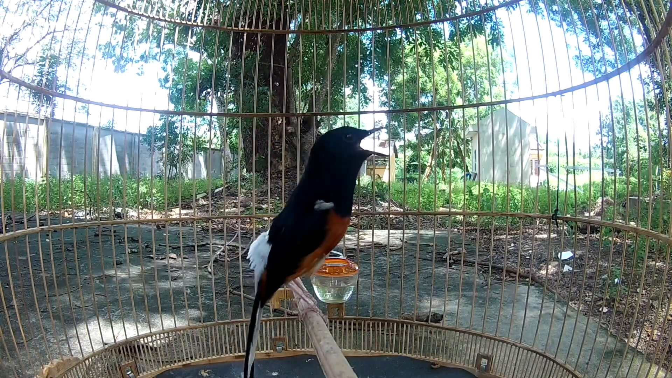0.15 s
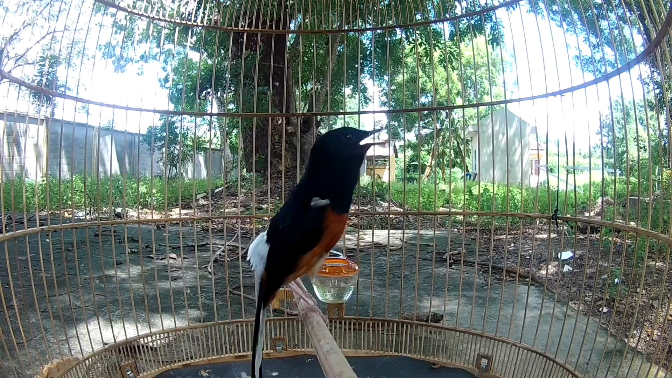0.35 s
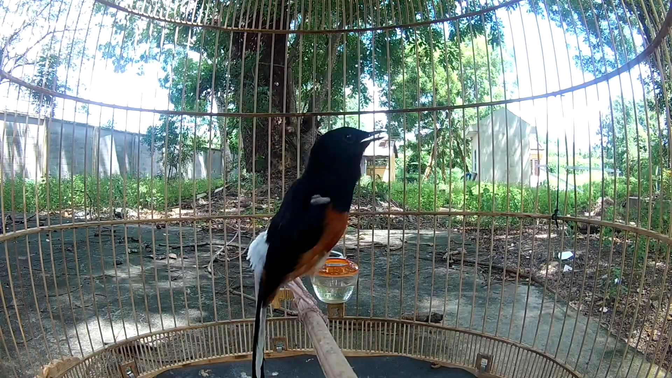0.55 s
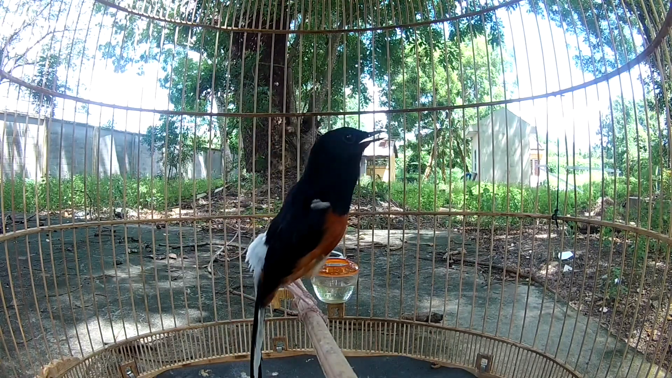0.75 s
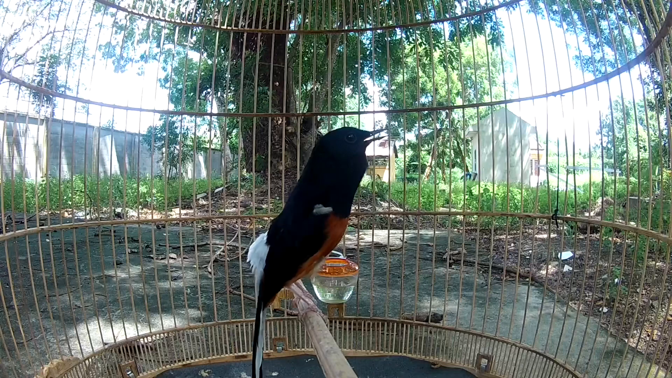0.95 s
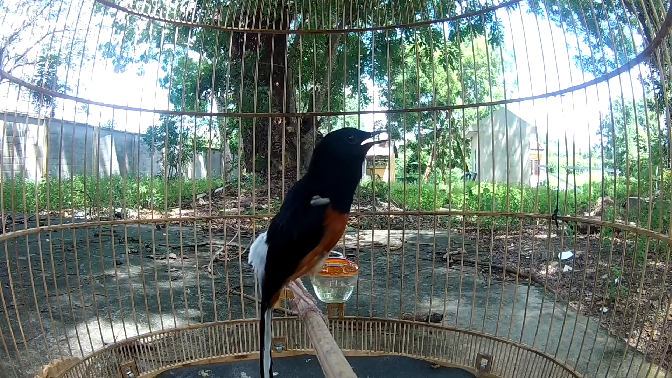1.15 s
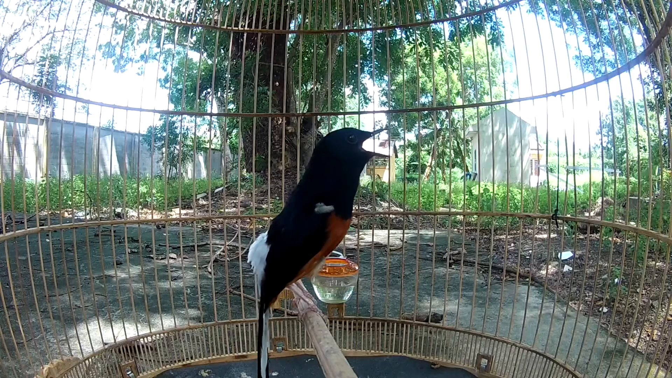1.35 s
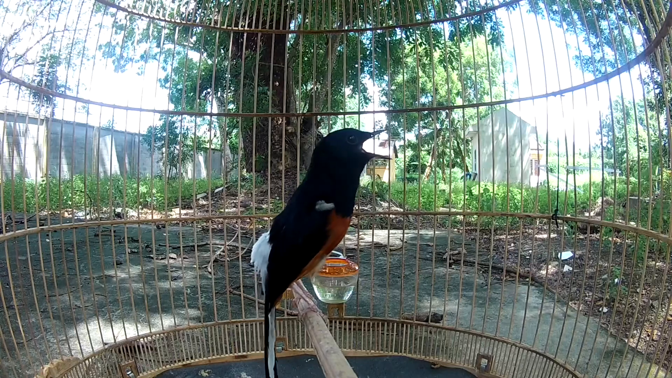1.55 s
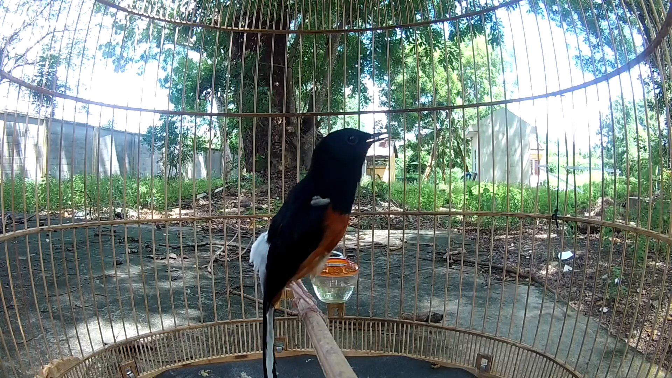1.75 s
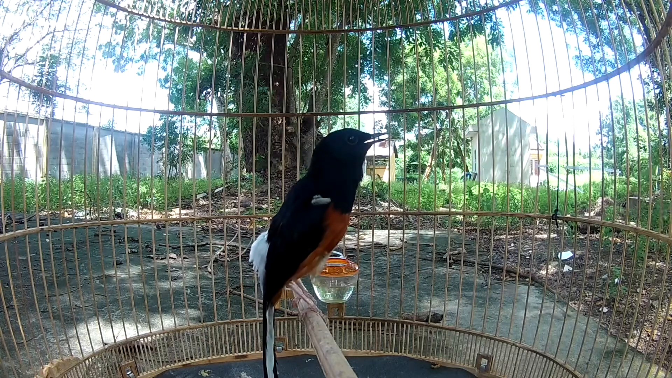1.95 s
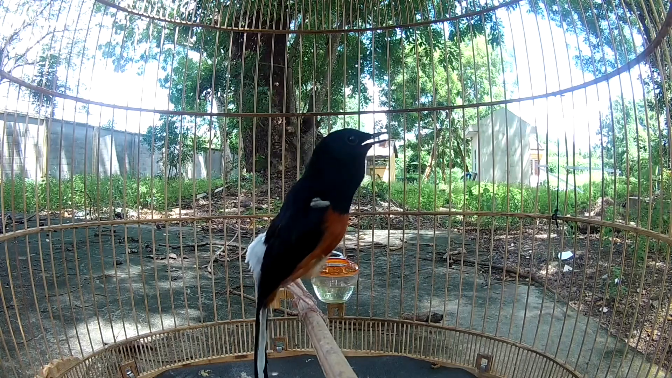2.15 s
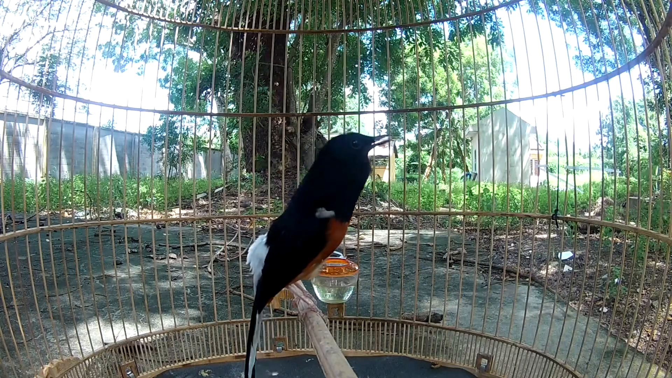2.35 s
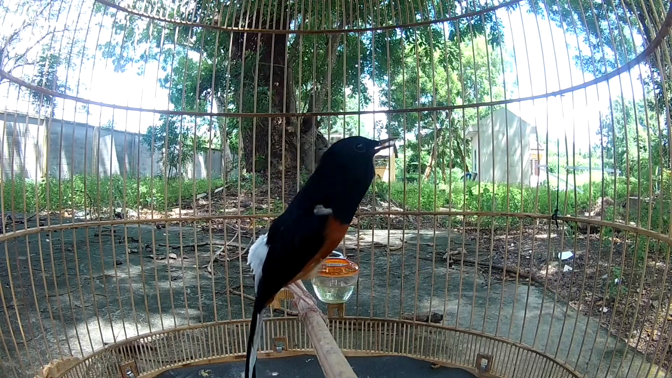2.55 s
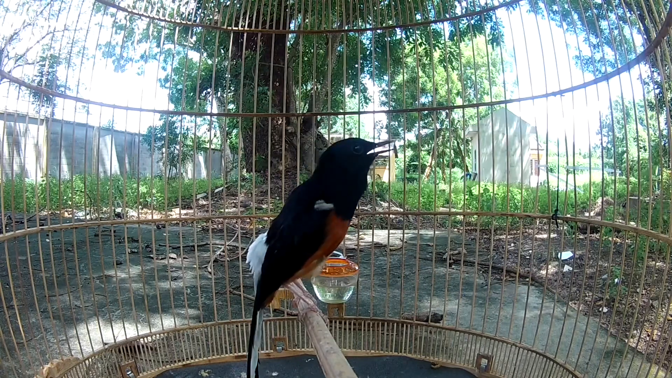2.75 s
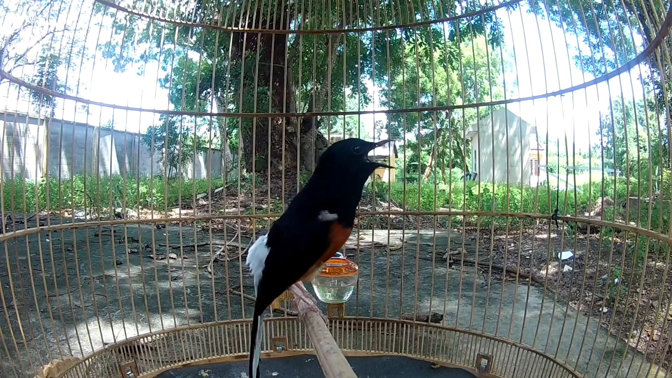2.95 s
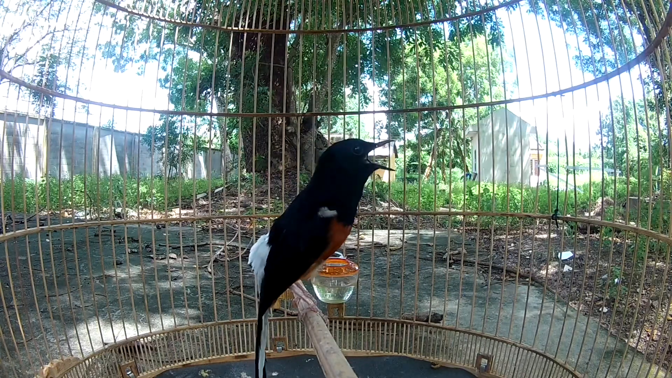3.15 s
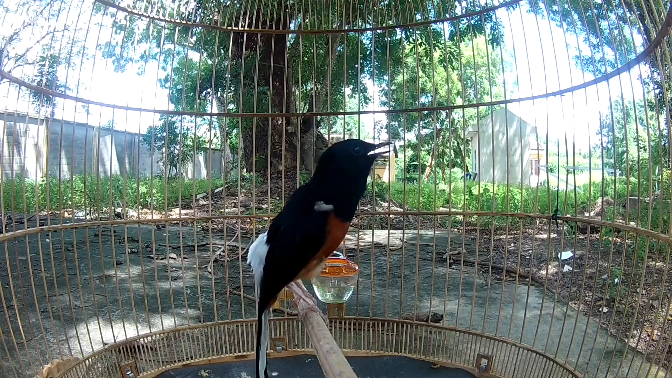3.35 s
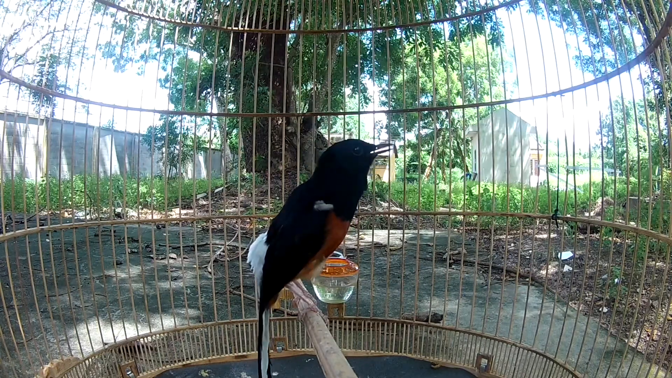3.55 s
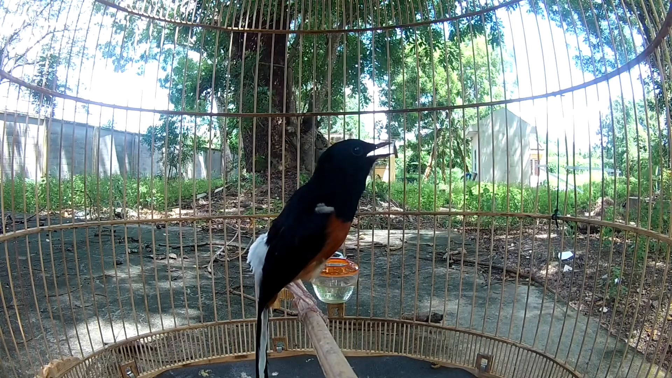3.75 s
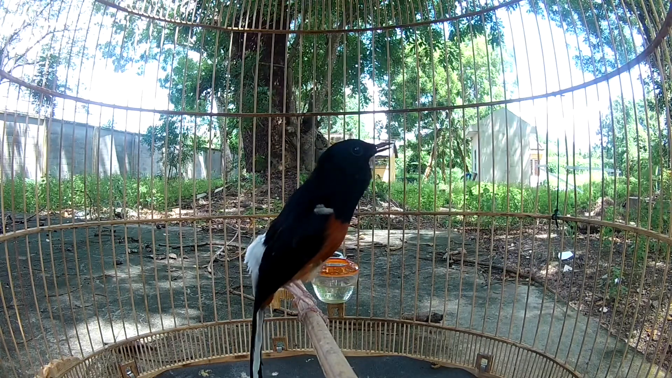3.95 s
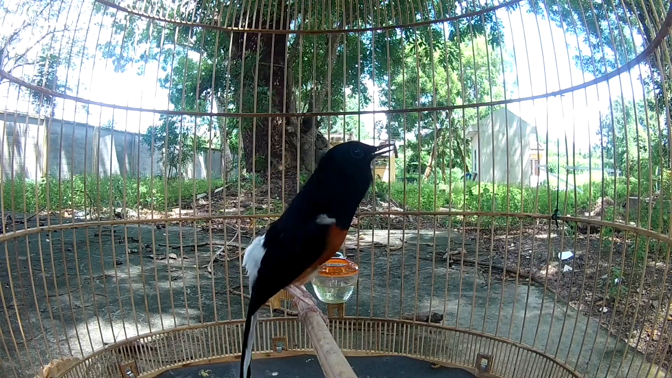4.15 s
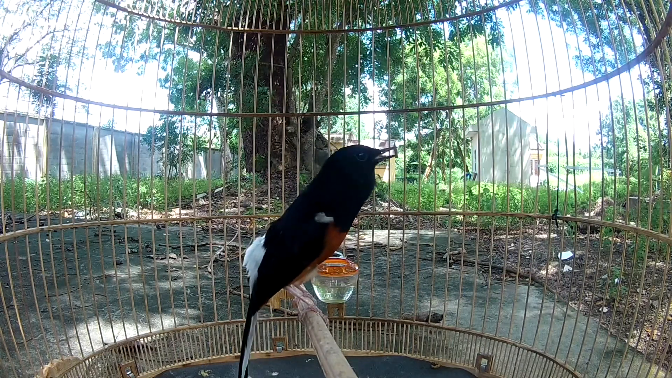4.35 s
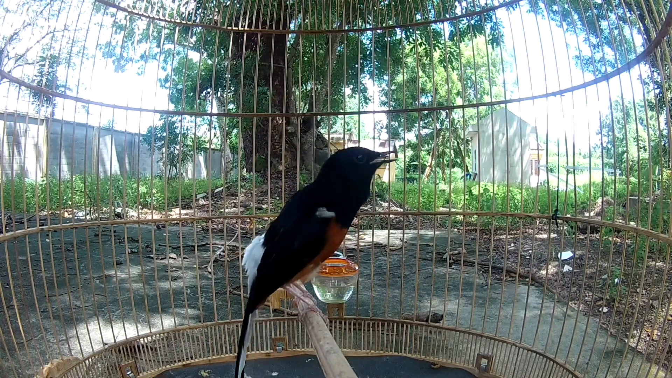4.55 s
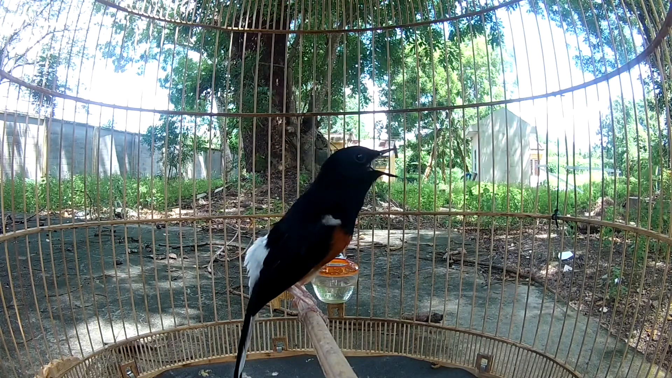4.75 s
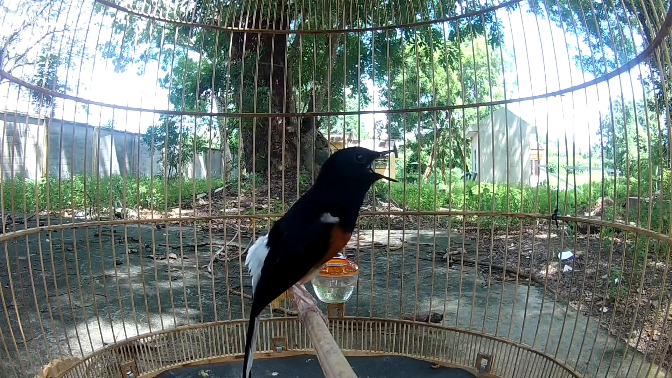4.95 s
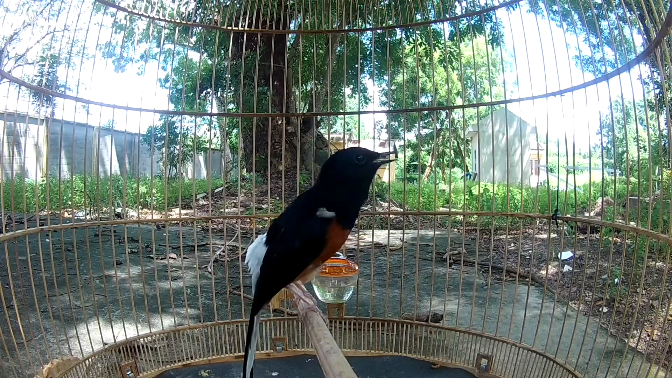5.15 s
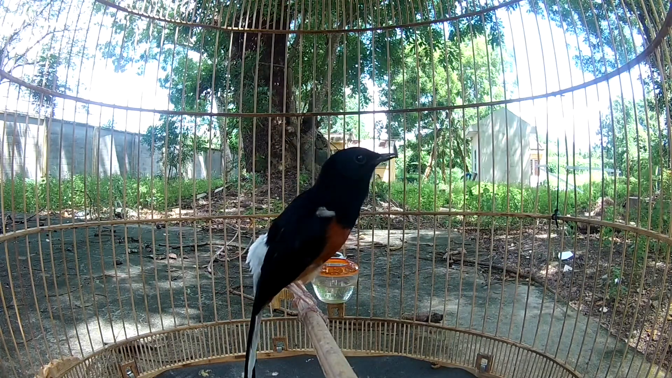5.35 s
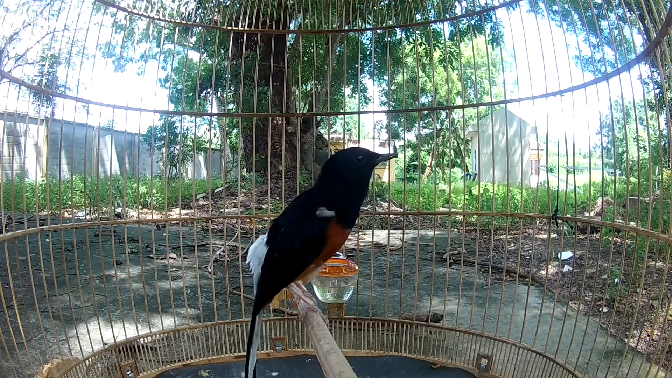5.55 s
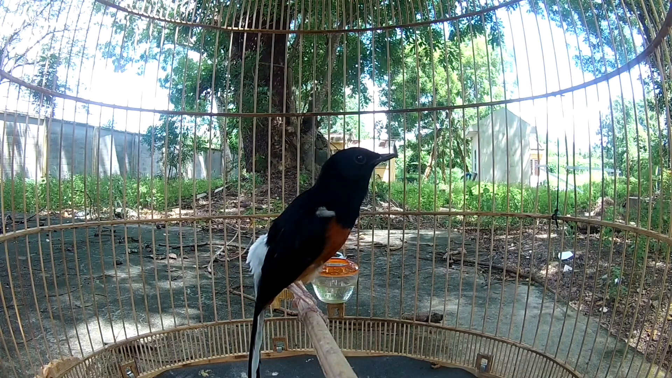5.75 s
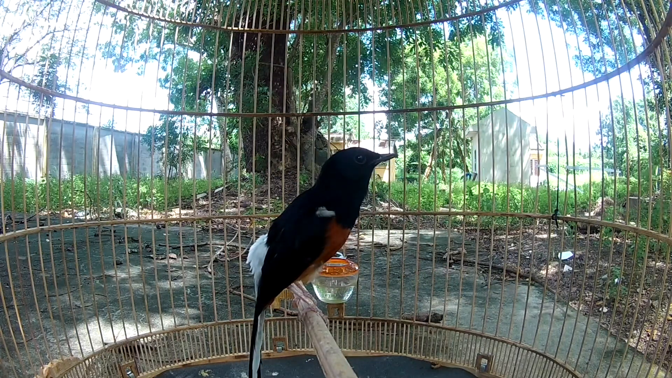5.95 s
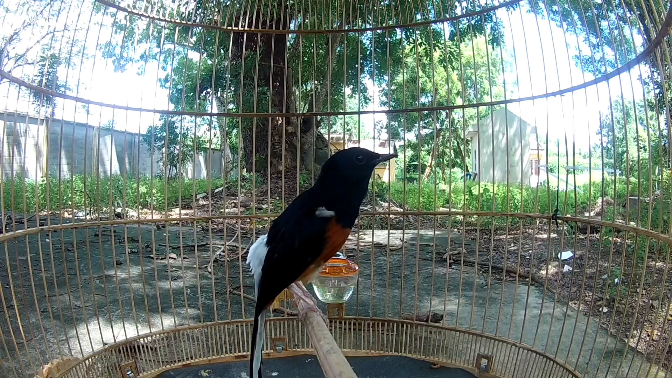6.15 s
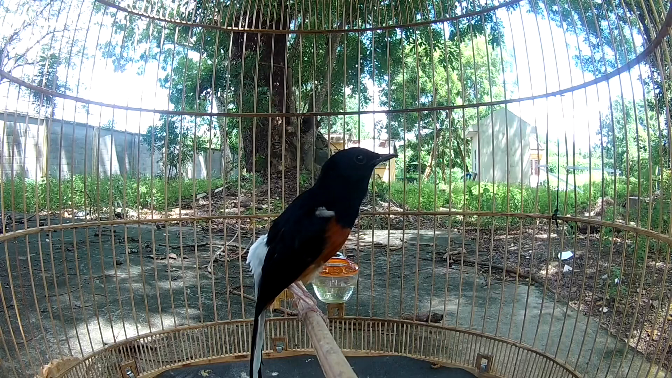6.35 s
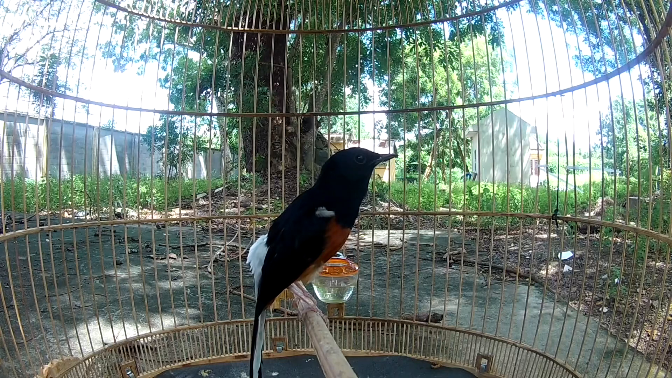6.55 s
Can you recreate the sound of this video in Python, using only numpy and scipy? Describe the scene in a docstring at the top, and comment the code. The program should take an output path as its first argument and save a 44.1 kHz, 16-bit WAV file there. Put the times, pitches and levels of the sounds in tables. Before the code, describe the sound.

A caged songbird sings close by in a yard, loud and clear with a slight, short echo. It opens with a whistle that climbs, trembles and ends in a quick zigzag. A falling whistle and a low swoop with a final flick follow from 0.7 to 1.1 seconds. The loud rising slur returns at about 1.3, 2.8 and 4.7 seconds, each lasting under half a second. Between these, a soft chup leads into a burst of rattling chatter at 2.1 seconds and again at 4 seconds, with a quiet twitter at 3.7. After a pause from 5.1 seconds, a softer, thin whistle rises slowly from 6 seconds and turns raspy around 6.4. Another bird calls faintly in the distance between 0.6 and 2.1 seconds. A faint motor hum and low air noise continue throughout, and soft background noise swells from about 5.7 seconds.

```python
"""A yard with a caged shama singing close by. Its syrinx makes loud slurs that climb, tremble and end
in a zigzag, low swoops, soft chups, two bursts of chatter from both sides at once, a twitter and a thin
whistle that turns raspy. Throat and beak colour the overtones; trees and walls return a short tail.
A motor hums, another bird calls far off, and faint background noise swells near the end."""
import sys
import numpy as np
from scipy import signal
from scipy.fft import rfft, irfft, next_fast_len
from scipy.io import wavfile
from scipy.ndimage import uniform_filter1d

SR = 44100
rng = np.random.default_rng(int(sys.argv[2]) if len(sys.argv) > 2 else 0)


def store_pcm(level_fs):
    """Save levels as 16-bit WAV."""
    pcm = np.round(np.clip(level_fs, -1, 1) * 32767).astype(np.int16)
    wavfile.write(sys.argv[1], SR, np.atleast_2d(pcm).T)


N = 291501
TIME = np.arange(N) / SR
CUTOFF_HZ = 15900
# Throat and beak response. Each row: frequency in Hz, gain in dB.
BEAK_RESPONSE = [(2300, 12.5), (3300, -6.5), (5200, 0), (6800, 2), (8000, -2), (9500, 6.5), (11000, -1),
                 (15000, -4)]


def from_db(db):
    """Decibels to gain."""
    return 10 ** (np.asarray(db) / 20)


def unit_rms(x):
    """Scale to rms 1."""
    return x / np.sqrt(np.mean(x ** 2) + 1e-20)


def db_at(spectrum, hz):
    """Read a spectrum on a log-frequency axis."""
    freqs, db = np.transpose(spectrum)
    return np.interp(np.log(np.maximum(hz, 1)), np.log(freqs), db)


def along(rows, t):
    """Read a curve's columns at times t."""
    times, *columns = np.transpose(sorted(map(tuple, rows)))
    return [np.interp(t, times, column) for column in columns]


def span(start_s, end_s):
    """Sample times between two moments."""
    return TIME[max(0, int(start_s * SR)):int(end_s * SR)]


def glide(rows, start_s=0):
    """Times, pitch and level of a note along a curve."""
    t = span(start_s + rows[0][0] - .001, start_s + rows[-1][0] + .002)
    return (t, *along(rows, t - start_s))


def add(out, t, sound):
    """Mix a sound in at its sample times."""
    first = int(round(t[0] * SR))
    out[first:first + len(t)] += sound


def fade(t, rise_s, fall_s):
    """Quarter-sine attack and release."""
    rise = np.sin(np.pi / 2 * np.clip((t - t[0]) / rise_s, 0, 1))
    fall = np.sin(np.pi / 2 * np.clip((t[-1] - t) / fall_s, 0, 1))
    return rise * fall


def noise(spectrum, size):
    """Coloured noise, rms 1."""
    n = next_fast_len(size)
    gain = from_db(db_at(spectrum, np.arange(n // 2 + 1) * SR / n))
    return unit_rms(irfft(rfft(rng.standard_normal(n)) * gain, n)[:size])


def waver(rate_hz, size):
    """Random drift up to rate_hz, rms 1."""
    lowpass = signal.butter(2, rate_hz, fs=SR, output="sos")
    return unit_rms(signal.sosfilt(lowpass, rng.standard_normal(size + SR // 2))[SR // 2:])


def syrinx(hz, amplitude, kind, jitter, follow, brightness=1, usual_db=-15, flicker_db=4.5):
    """One syrinx side. Throat resonance swells the fundamental; overtones follow in part and flicker."""
    # Per kind of note: base levels in dB, from partial 2 up.
    overtones_db = {"slur": [-55.5, -73.5, -66.5], "swoop": [-52.5, -66, -77, -80], "twitter": [-43.5,
                    -66.5], "thin": [-57, -76.5, -89, -77.5], "chatter": [-51, -62, -77], "far": []}
    phase = 2 * np.pi * np.cumsum(hz * (1 + jitter * waver(250, len(hz)))) / SR
    drive = brightness * (np.abs(amplitude) / from_db(usual_db)) ** follow
    tone = amplitude * np.sin(phase)
    for k, db in enumerate(overtones_db[kind], 2):
        level_db = db + db_at(BEAK_RESPONSE, k * hz) + flicker_db * waver(70, len(hz))
        tone += drive * from_db(level_db) * (k * hz < CUTOFF_HZ) * np.sin(k * phase)
    return tone


def tremble(t, linger_s=.062):
    """Each trough lowers the pitch and nearly chokes the note; the pitch shake lingers."""
    # Each row: first crest in seconds, last crest in seconds, rate in Hz, depth 0-1.
    trembles = [(.104, .14, 56, .75), (1.402, 1.456, 74, .8), (3.011, 3.118, 56, .85),
                (4.8445, 4.941, 51.7, .88)]
    shake, choke = np.zeros(len(t)), np.zeros(len(t))
    for first_s, last_s, rate_hz, depth in trembles:
        swing = np.cos(2 * np.pi * rate_hz * (t - first_s))
        strength = depth * np.clip((t - first_s) * rate_hz + 1, 0, 1)
        shake += strength * np.clip(1 - (t - last_s) / linger_s, 0, 1) * swing
        choke += strength * np.clip((last_s - t) * rate_hz + .5, 0, 1) * ((1 - swing) / 2) ** 2
    return shake, choke


def whistle(t, hz, db, kind, jitter=.0012, opening_db=0, shimmer_db=0, flutter=0,
            scrape_db=-77, swerve_dulling=.012):
    """One whistled note; overtones grow by opening_db as the beak opens."""
    hz, db = uniform_filter1d(hz, size=90), uniform_filter1d(db, size=90)
    shake, choke = tremble(t)
    softness = np.clip((-9 - db) / 8, 0, 1)   # hard-pushed notes are steady
    unsteady = softness * waver(120, len(t))
    # Fast pitch swerves turn overtones into a scrape.
    swerve = uniform_filter1d(np.abs(np.gradient(np.log(hz))) * SR, size=500)
    brightness = from_db(opening_db * np.linspace(-.5, .5, len(t))) / (1 + swerve_dulling * swerve)
    amplitude = np.sqrt(2) * from_db(db + shimmer_db * unsteady) * (1 - choke)
    shaken_hz = hz * (1 + .037 * shake + flutter * unsteady)
    tone = syrinx(shaken_hz, amplitude, kind, jitter, follow=.24, brightness=brightness)
    lowpass = signal.butter(8, 9800, fs=SR, output="sos")
    scrape = from_db(scrape_db + db / 2) * swerve * signal.sosfilt(lowpass, noise(BEAK_RESPONSE, len(t)))
    out = np.zeros(N)
    add(out, t, (tone + scrape) * fade(t, .003, .003))
    return out


def zigzag(turns, first_floor_hz, crest_rise_hz, shoulder_hz=3430):
    """Pitch in Hz of a slur's turns: a shallow first dip, each crest above the last."""
    # One turn. Each row: position 0-1, pitch in Hz.
    turn_shape = [(0, 4217), (.13, 3438), (.23, 2260), (.34, 2060), (.46, 2344), (.6, 3166), (.78, 3402),
                  (1, 4233)]
    swing_hz = along(turn_shape, turns % 1)[0] - shoulder_hz
    below = np.minimum(swing_hz, 0)
    below *= np.where(turns < 1, (first_floor_hz - shoulder_hz) / below.min(), 1)
    above = np.maximum(swing_hz, 0) * (turns > .5)
    above *= 1 + crest_rise_hz * (np.round(turns) - 1) / above.max()
    return shoulder_hz + below + above


def slurs(climb_from_hz=2680, base_db=-17, push_lag_s=.0099, blend_s=.0037):
    """A hard push dips the pitch, which then climbs and breaks into turns. Loudness follows pitch."""
    # Each row: start in seconds; scoop time in seconds, pitch in Hz, width in seconds; push in dB,
    # its width in seconds; climb top in Hz, curvature; first turn's floor in Hz; zigzag start and
    # turn length in seconds; crest rise in Hz per turn; end in seconds.
    phrases = [(-.04, -0.011, 2280, 0.028, 18.5, 0.015, 3366, 2.02, 2650, .207, 0.057, 200, .376),
               (1.275, 1.327, 2271, 0.041, 17.45, .06, 3580, 1.52, 2440, 1.533, .0585, 800, 1.659),
               (2.833, 2.895, 2291, .047, 17, 0.084, 3748, 1.4, 2900, 3.166, .056, 400, 3.294),
               (4.655, 4.701, 2192, 0.044, 20.5, .102, 3720, 1.435, 2150, 5.001, 0.056, 600, 5.114)]
    # How strongly each pitch carries. Each row: pitch in Hz, gain in dB.
    carry = [(2100, -4), (2330, -4), (2520, -4.5), (2750, -13), (2900, -20.5), (3100, -3.5), (3280, 0),
             (3750, -2), (4100, -8), (4400, -22), (5000, -22.5)]
    out = np.zeros(N)
    for (start_s, scoop_s, scoop_hz, width_s, push_db, push_s, top_hz, curvature,
         first_floor_hz, zigzag_s, turn_s, crest_rise_hz, end_s) in phrases:
        t = span(start_s, end_s)
        progress = np.clip((t - scoop_s) / (zigzag_s - scoop_s), 0, 1)
        climbed = np.sin(np.pi / 2 * progress ** curvature) ** 2
        dip_hz = (climb_from_hz - scoop_hz) * np.exp(-((t - scoop_s) / width_s) ** 2)
        climb_hz = climb_from_hz + (top_hz - climb_from_hz) * climbed - dip_hz
        zigzag_hz = zigzag((t - zigzag_s) / turn_s, first_floor_hz, crest_rise_hz)
        hz = climb_hz + (zigzag_hz - climb_hz) * np.clip((t - zigzag_s) / blend_s, 0, 1)
        push = np.exp(-((t - scoop_s - push_lag_s) / push_s) ** 2)
        attack_db = -38.5 * np.exp(-(t - start_s) / .015)   # breath builds
        release_db = -12 * np.exp((t - end_s) / .014)   # breath gives out
        db = base_db + push_db * push + attack_db + release_db + db_at(carry, hz)
        jitter = .0011 + .0016 * (1 - push)
        out += whistle(t, hz, db, "slur", jitter=jitter, shimmer_db=.65, flutter=.008, scrape_db=-75)
    return out


def still_air(level_db=-52.5):
    """Low, steady noise of the air."""
    # Each row: frequency in Hz, relative density in dB.
    spectrum = [(25, -16), (45, 1.5), (90, -2.5), (200, -12), (700, -15), (1300, -20), (2500, -30),
                (4000, -36), (6000, -59.5)]
    return from_db(level_db) * noise(spectrum, N)


def motor(waver_db=1.34):
    """Hum whose partials drift slightly in level and phase."""
    # Each row: frequency in Hz, rms level in dB.
    partials = [(172.3, -52), (349.9, -67), (608.3, -61.5), (694.4, -57), (866.7, -66), (1217, -70.5)]
    out = np.zeros(N)
    for hz, db in partials:
        amplitude = np.sqrt(2) * from_db(db + waver_db * waver(2.5, N))
        out += amplitude * np.sin(2 * np.pi * (hz * TIME + rng.random()) + .3 * waver(3, N))
    return out


def far_bird():
    """Two small whistled calls, repeated: a drop and an arch."""
    # Each row: time into the call in seconds, pitch in Hz, level in dB.
    drop = [(0, 5300, -68), (.012, 4400, -56), (.026, 3850, -57.5)]
    arch = [(0, 2450, -60), (.04, 2650, -63.5), (.06, 3350, -55.5), (.09, 2700, -62)]
    # Call starts in seconds.
    drop_starts_s = [0.621, 1.018, 1.425, 1.843]
    arch_starts_s = [0.762, 1.168, 1.99]
    calls = [(drop, s) for s in drop_starts_s] + [(arch, s) for s in arch_starts_s]
    return sum(whistle(*glide(call, start_s), "far") for call, start_s in calls)


def swoops():
    """A falling whistle, then a low swoop ending in a flick."""
    # Each row: time in seconds, pitch in Hz, level in dB.
    fall = [(0.675, 2072, -44.5), (0.691, 1998, -18), (0.705, 1810, -15), (0.725, 1717, -24),
            (0.733, 1594, -14), (0.741, 1416, -5), (0.757, 1152, -15.5), (0.767, 1090, -30.5)]
    swoop = [(0.863, 1800, -38), (0.901, 1559, -9.5), (0.935, 1161, -8), (0.963, 1130, -15),
             (0.981, 1264, -12), (1.003, 1496, -7), (1.015, 1574, -10.5), (1.057, 1618, -9),
             (1.072, 1756, -25)]
    flick = [(1.077, 1720, -16), (1.089, 1792, -9.5), (1.094, 2010, -3.5), (1.098, 2434, -17),
             (1.106, 2098, -3.5), (1.114, 2070, -35.5)]
    return sum(whistle(*glide(note), "swoop", scrape_db=-86.5) for note in (fall, [*swoop, *flick]))


def chups():
    """Soft nasal notes of arched pitch; partial 2 sits on the throat resonance."""
    # Each row: start in seconds, length in seconds, top pitch in Hz, level in dB.
    notes = [(2.109, .05, 615.7, -27), (3.984, 0.054, 620, -25)]
    # Partial gains in dB, from the fundamental up.
    partials_db = [-17, 1.5, -24, -26, -41.5]
    out = np.zeros(N)
    for start_s, length_s, top_hz, db in notes:
        t = span(start_s, start_s + length_s)
        position = np.linspace(-1, 1, len(t))
        unsteady = (.016 + .07 * position ** 4) * waver(700, len(t))   # roughest at both ends
        hz = top_hz * (1 - .14 * position ** 2) * (1 + unsteady)
        phase = 2 * np.pi * np.cumsum(hz) / SR
        tone = sum(from_db(gain_db) * np.sin(k * phase) for k, gain_db in enumerate(partials_db, 1))
        add(out, t, from_db(db) * (1 - position ** 2) ** .58 * tone)
    return out


def chatter_pushes(rattle_hz=1150, first_hz=1087, high_hz=1587, later_hz=1137):
    """Yield each push of air: start in seconds, length in seconds, settled pitch in Hz, level in dB."""
    # Burst starts in seconds.
    bursts_s = [2.2365, 4.1115]
    # A lingering high chip and a low double knock.
    # Each row: delay in seconds, length in seconds, settled pitch in Hz, level in dB.
    opening = [(0, .017, 1664, -9.5), (0.012, .11, 1648, -31), (0.028, 0.018, 1078, -5),
               (.043, .013, 1055, -4.5)]
    # Each row: start in seconds, first low push's length in seconds and level in dB,
    # high tone's length in seconds and level in dB, later low pushes' level in dB and count.
    syllables = [(2.372, 0.019, -5, 0.033, -19.5, -8.5, 1), (2.434, 0.017, -5.5, 0.032, -20.5, -8, 1),
                 (2.495, 0.019, -6.5, 0.044, -17.5, -7.5, 2), (2.554, 0.022, -11.5, 0.034, -21, -10.5, 2),
                 (4.251, 0.016, -5.5, 0.028, -13.5, -16, 1), (4.31, 0.019, -6.5, .034, -14.5, -9.5, 1),
                 (4.369, 0.021, -9.5, 0.051, -14, -8.5, 2), (4.432, 0.03, -14, 0.02, -24.5, -14, 1)]
    for start_s in bursts_s:
        for delay_s, length_s, hz, db in opening:
            yield start_s + delay_s, length_s, hz, db
        for k in range(4):   # the knock runs out in a rattle
            yield start_s + .063 + k * .0133, .0075, rattle_hz, -13.5 - k * 1.6
    for start_s, first_s, first_db, high_s, high_db, later_db, count in syllables:
        yield start_s, first_s, first_hz, first_db
        yield start_s + .013, high_s, high_hz, high_db
        for k in range(round(count)):
            yield start_s + .025 + k * .016, .013, later_hz, later_db


def chatter(rest_hz=1450, settle_s=.0043, sag_db=6, breath_db=-39, high_side_air_db=-9):
    """Both syrinx sides start near one pitch and pull apart; where they overlap they beat."""
    voice, airflow = np.zeros(N), np.zeros(N)
    for start_s, length_s, settled_hz, db in chatter_pushes():
        t = span(start_s - .0015, start_s + length_s + .001)
        age_s = t - t[0]
        roughness = np.minimum(age_s / .04, 1)   # a held side loses steadiness
        hz = settled_hz + (rest_hz - settled_hz) * np.exp(-age_s / settle_s)
        hz *= 1 + .06 * roughness * waver(200, len(t))
        flutter_db = 3 * roughness * waver(250, len(t))
        push = from_db(db - sag_db * age_s / length_s + flutter_db) * fade(t, .0045, .0045) ** 1.5
        add(voice, t, syrinx(hz, push, "chatter", jitter=.0035, follow=.52))
        add(airflow, t, push * (from_db(high_side_air_db) if settled_hz > rest_hz else 1))
    # Each row: frequency in Hz, relative density in dB.
    turbulence = [(1200, 3), (2400, -6.5), (3200, -16.5), (4400, -4), (5800, -23.5), (7700, -31.5),
                  (9000, -17), (10500, -36.5)]
    breath = from_db(breath_db) * airflow * noise(turbulence, N)
    throat = signal.butter(8, 950, "high", fs=SR, output="sos")
    return signal.sosfilt(throat, voice + breath)


def twitter():
    """A quiet whistle with fast, jittery pitch swings."""
    # Each row: time in seconds, pitch in Hz, level in dB.
    curve = [(3.674, 1550, -44.5), (3.68, 2180, -34), (3.686, 2950, -48), (3.698, 3170, -41.5),
             (3.711, 2120, -30), (3.72, 2050, -29.5), (3.741, 2900, -49), (3.754, 2850, -43),
             (3.769, 1850, -45)]
    return whistle(*glide(curve), "twitter", jitter=.012, swerve_dulling=0, scrape_db=-73)


def noise_swell(waver_db=1.5):
    """Faint background noise swells near the end."""
    # Each row: frequency in Hz, relative density in dB.
    spectrum = [(80, -1), (200, -7.5), (1500, -21.5), (6000, -41), (15000, -42.5)]
    # Each row: time in seconds, rms level in dB.
    swell = [(5.6, -69.5), (5.75, -52.5), (6.0, -50), (6.6, -50.5)]
    level_db = along(swell, TIME)[0] + waver_db * waver(8, N)
    return from_db(level_db) * noise(spectrum, N)


def thin_whistle():
    """A slowly rising note that brightens as the beak opens."""
    # Each row: time in seconds, pitch in Hz, level in dB.
    curve = [(6.008, 2260, -51), (6.023, 2202, -41), (6.074, 2268, -27), (6.188, 2332, -24.5),
             (6.222, 2384, -26.5), (6.273, 2404, -22), (6.298, 2490, -30.2), (6.322, 2420, -25.5),
             (6.487, 2610, -38.5), (6.529, 2615, -25.5), (6.552, 2665, -43)]
    return whistle(*glide(curve), "thin", jitter=.0022, opening_db=25.5, shimmer_db=.43)


def rasp(width_hz=210, top_hz=4000):
    """The second syrinx side flutters irregularly: a narrow, rising noise band."""
    # Each row: time in seconds, centre in Hz, level in dB.
    curve = [(6.385, 2900, -53), (6.41, 3500, -35.5), (6.452, 3980, -28.5), (6.5, 3880, -46.5),
             (6.61, 3790, -60)]
    t = span(curve[0][0], curve[-1][0])
    hz, db = along(curve, t)
    phase = 2 * np.pi * np.cumsum(hz) / SR
    band = waver(width_hz, len(t)) * np.cos(phase) + waver(width_hz, len(t)) * np.sin(phase)
    out = np.zeros(N)
    add(out, t, from_db(db) * band)
    return signal.sosfilt(signal.butter(16, top_hz, fs=SR, output="sos"), out)


def yard_echo(x, early_db, tail_db, early_t60_s=.18, tail_t60_s=.58):
    """Dense early scatter from cage and ground, then a tail from trees and walls."""
    # Each row: frequency in Hz, relative gain in dB.
    colour = [(2300, -1), (3500, 1.5), (5000, 1.5), (12000, -17.5)]
    t = TIME[:SR]
    early = np.exp(-np.log(1000) * t / early_t60_s) * (t > .003) * noise(colour, SR)
    tail = np.exp(-np.log(1000) * t / tail_t60_s) * np.clip(t / .015, 0, 1) * noise(colour, SR)
    response = from_db(early_db) * unit_rms(early) + from_db(tail_db) * unit_rms(tail)
    return signal.fftconvolve(x, response / np.sqrt(SR))[:N]


def scene():
    """Mono mix: the shama almost dry, the far bird with more echo, a quiet background."""
    song = slurs() + swoops() + twitter() + thin_whistle() + chatter() + chups() + rasp()
    far = far_bird()
    song += yard_echo(song, early_db=-23, tail_db=-31.5)
    far += yard_echo(far, early_db=-16, tail_db=-13)
    background = still_air() + motor()
    microphone_hiss = from_db(-78.5) * rng.standard_normal(N)
    return (song + far + background + microphone_hiss + noise_swell())[None]


def record(dry):
    """Hard clipping of the loudest notes, then a steep low-pass."""
    lowpass = signal.ellip(10, .1, 80, CUTOFF_HZ, fs=SR, output="sos")
    return signal.sosfilt(lowpass, np.clip(dry, -1, 1))


dry = scene()
out = record(dry)
store_pcm(out)
```